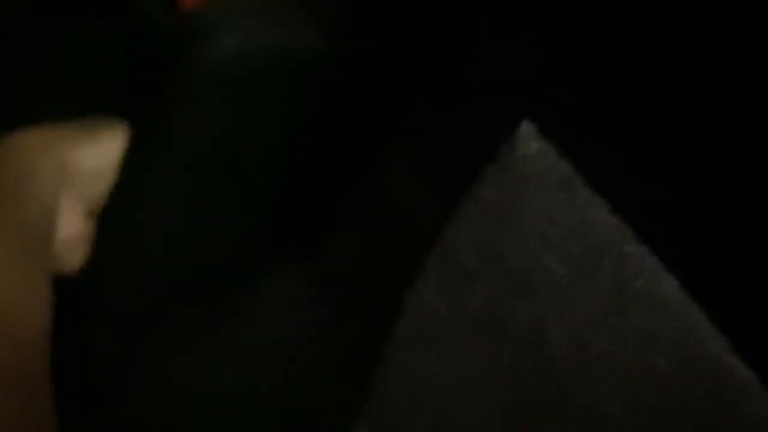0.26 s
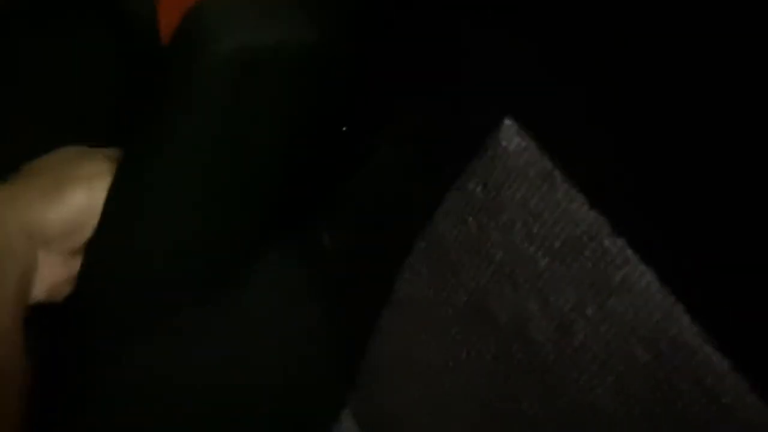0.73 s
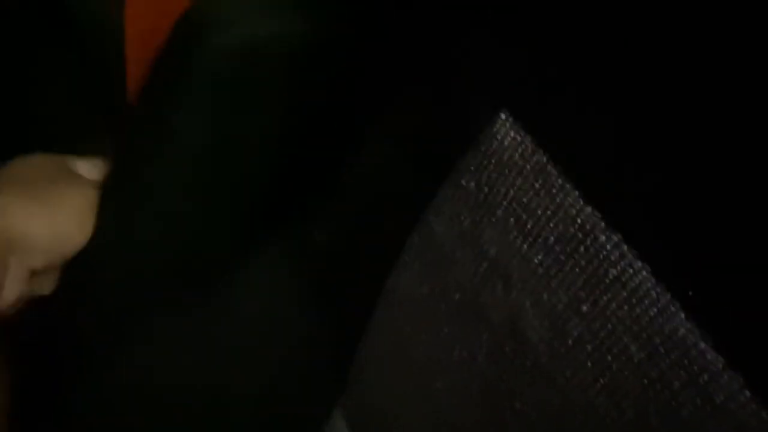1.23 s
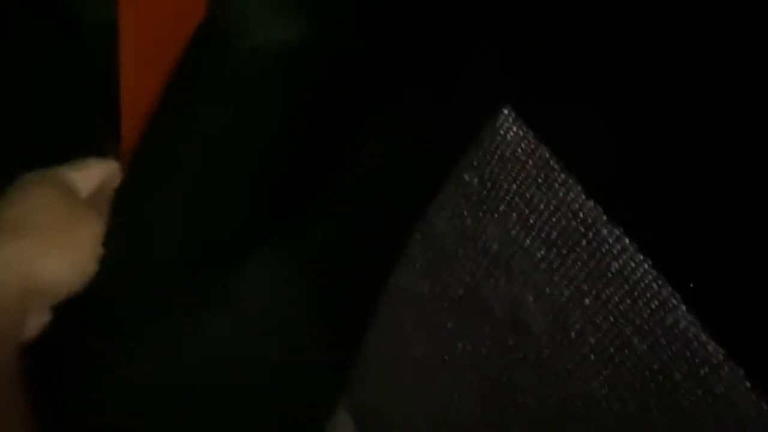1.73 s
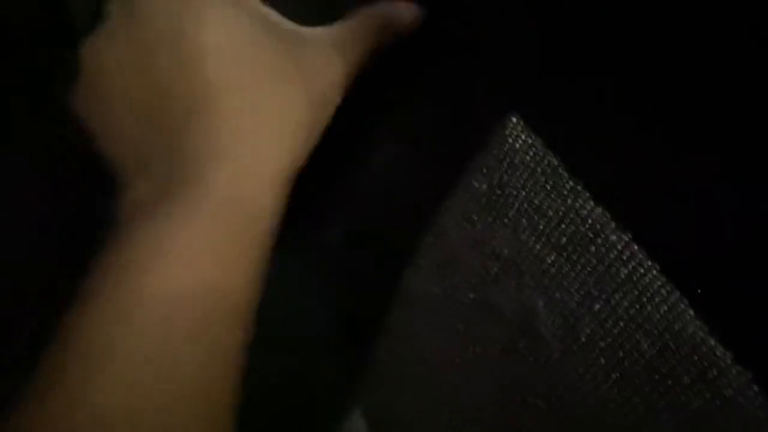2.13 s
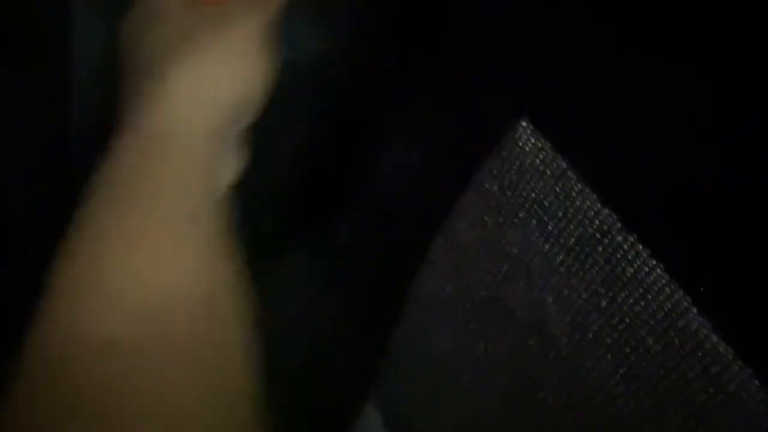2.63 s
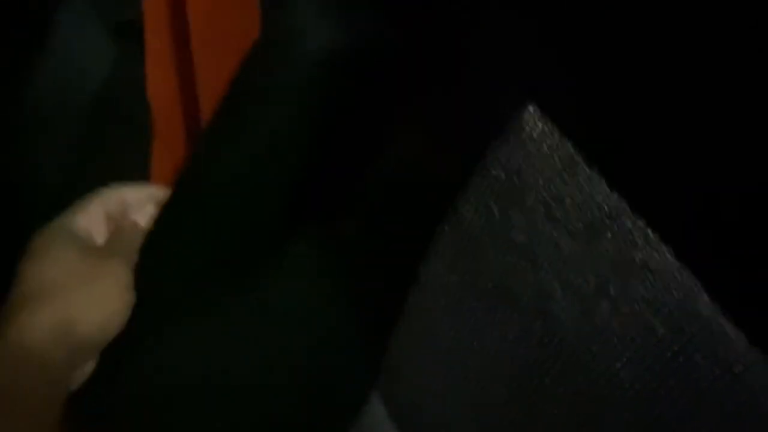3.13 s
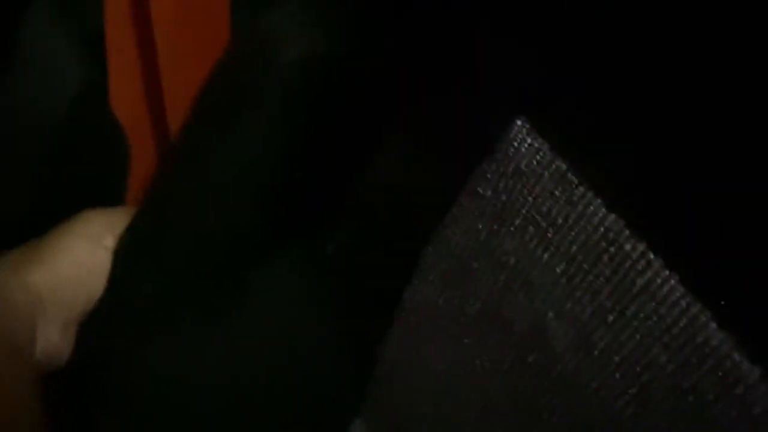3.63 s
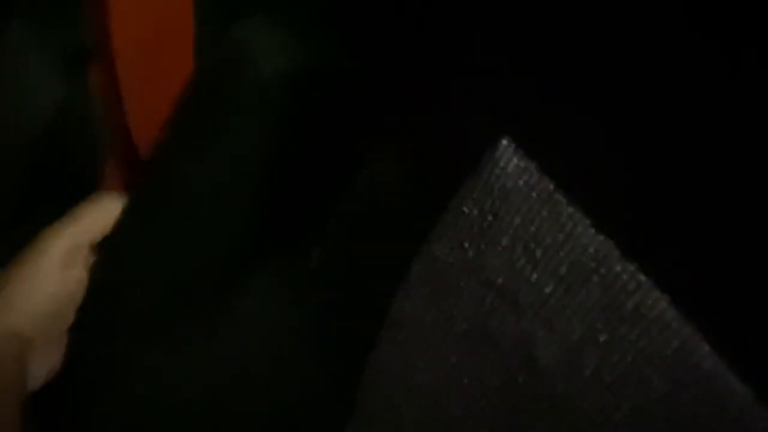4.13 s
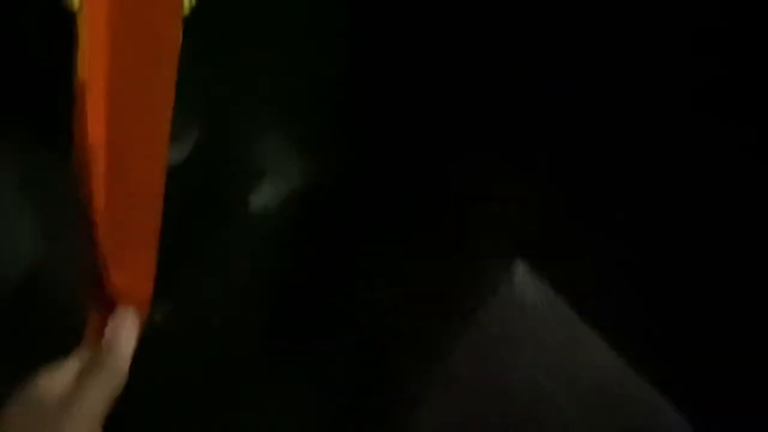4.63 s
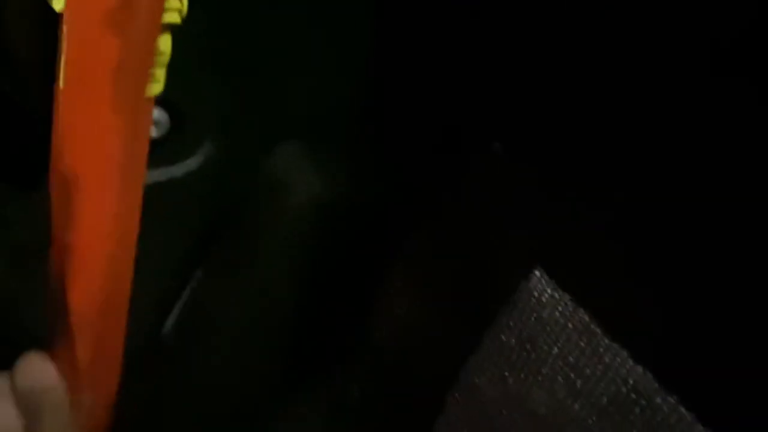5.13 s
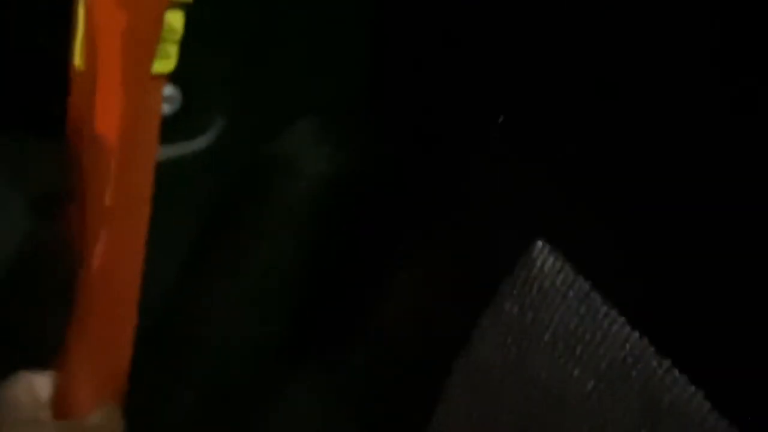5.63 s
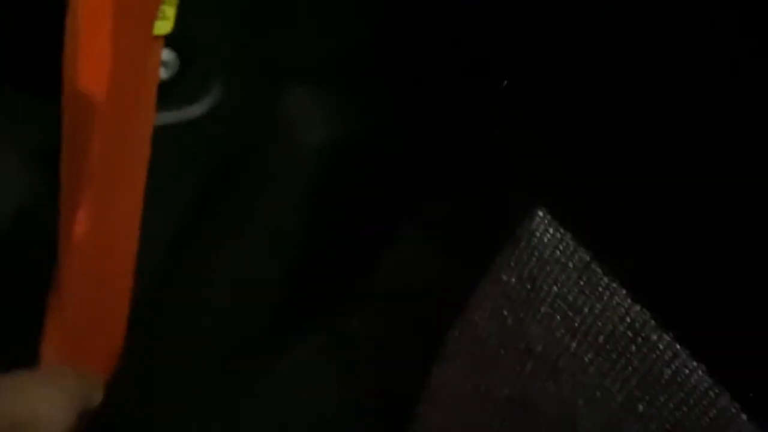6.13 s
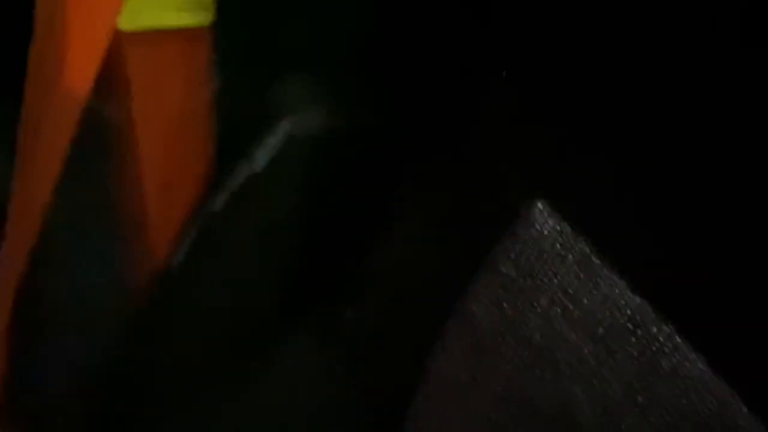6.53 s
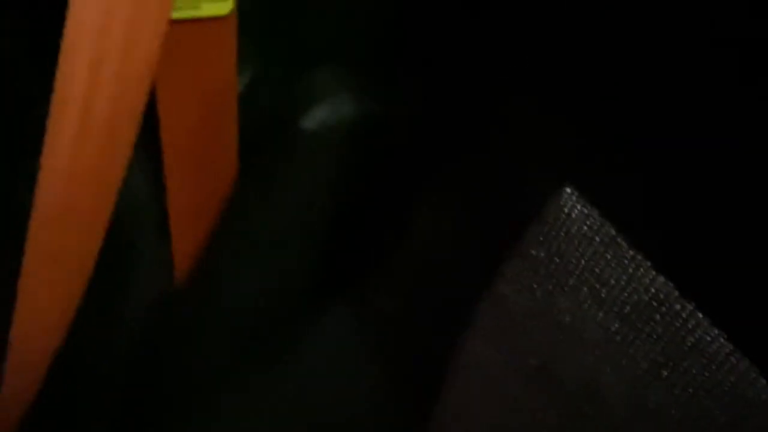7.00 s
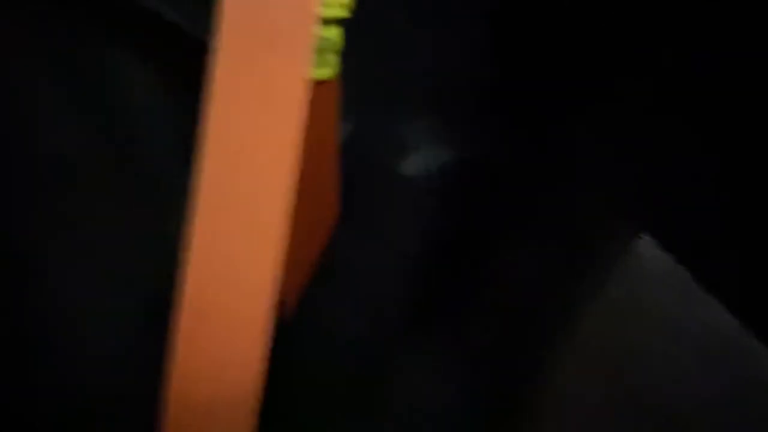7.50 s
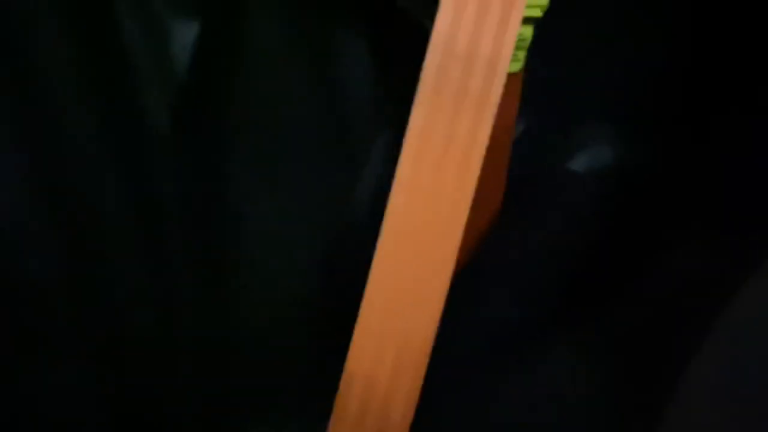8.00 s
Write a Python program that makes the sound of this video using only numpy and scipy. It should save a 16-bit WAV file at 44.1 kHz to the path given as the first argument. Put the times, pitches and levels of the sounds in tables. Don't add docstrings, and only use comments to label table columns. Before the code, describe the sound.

Inside a small parked truck cab, a hand draws out a seatbelt in uneven, dry rustling strokes. An early hollow knock hits the door, then light clicks and a cluster of dull bumps follow. A crisp metal click comes past the middle, then the loudest snap, with small ticks afterwards. A low idle hum and faint gliding traffic whine lie underneath. Close phone stereo pickup, very short reflections.

```python
import sys
import numpy as np
from scipy import signal
from scipy.fft import rfft, irfft, next_fast_len
from scipy.io import wavfile
from scipy.ndimage import uniform_filter1d

SR = 44100
rng = np.random.default_rng(int(sys.argv[2]) if len(sys.argv) > 2 else 0)


def rack_gain(trim_db):
    fader = np.asarray(trim_db, float)
    return 10 ** (fader / 20)


def waveform_to_disk(signal):
    frames = np.transpose(np.atleast_2d(signal))
    scaled = np.clip(frames, -1, 1) * 32767
    samples = np.round(scaled).astype(np.int16)
    wavfile.write(sys.argv[1], SR, samples)


N = 364026


def evened(x):
    return x / np.sqrt(np.mean(x ** 2) + 1e-20)


def curve(rows, column=1):
    rows = np.array(rows)
    return np.interp(np.arange(N) / SR, rows[:, 0], rows[:, column])


def colour(x, points, spread=0):
    f, db = np.transpose(points)
    size = next_fast_len(N + 4096, real=True)
    hz = np.fft.rfftfreq(size, 1 / SR)
    late = np.exp(-2j * np.pi * spread * (2 * np.sqrt(hz) - hz / np.sqrt(1000)))
    gain = rack_gain(np.interp(np.log(hz + 1), np.log(f), db, left=-130))
    return irfft(rfft(x, size) * late * gain, size)[:N]


def wander(rate_hz):
    t = np.arange(0, N + 256, 256) / SR
    rates = np.geomspace(rate_hz / 12, rate_hz, 16)
    slow = sum(np.sin(2 * np.pi * (f * t + rng.random())) / np.sqrt(f) for f in rates)
    return np.interp(np.arange(N) / SR, t, evened(slow))


# f/Hz, level/dB, slow wavering/dB
ENGINE_ORDERS = [(46.9, -45, -2), (48.2, -58, 5.5), (59.3, -52.5, 3), (70.6, -36, 0.56), (90.14, -45, 3),
                 (97.8, -63, 5), (136.4, -60, 2.5)]
# f/Hz, spectral density/dB per Hz
CAB_FLOOR = [(25, -95.5), (36, -65.5), (55, -60.5), (100, -63.5), (330, -83), (1000, -105.5), (3500, -121),
             (15000, -132)]


def engine():
    t = np.arange(N) / SR
    orders = 0
    for hz, db, waver_db in ENGINE_ORDERS:
        level = np.sqrt(2) * rack_gain(db + waver_db * wander(2.5))
        orders = orders + level * np.sin(2 * np.pi * (hz * t + rng.random()))
    floor = colour(rng.standard_normal(N), CAB_FLOOR) * np.sqrt(SR / 2)
    return orders + floor * rack_gain(2.8 * wander(4.0))


# t/s, f/Hz, level/dB
TRAFFIC_WHINES = [
    [(0, 263, -52), (.35, 282.8, -55.5), (.88, 292.3, -48), (1.2, 279, -53.5), (1.45, 292, -48),
     (2.45, 302, -43.5), (2.8, 314, -43.5), (3.55, 331, -47), (3.92, 303, -53)],
    [(4.45, 248, -52), (4.9, 252, -50), (5.1, 259, -50.5), (5.45, 254, -51.5), (5.85, 260, -53),
     (5.95, 256, -66), (6.45, 250, -61), (6.75, 246, -51), (7.0, 240, -54.5)],
    [(7.03, 232, -55), (7.45, 227, -51.5), (7.6, 224, -62.5), (7.9, 220, -60), (8.26, 224.3, -52.5)],
]
# t/s, level/dB
TYRE_WASH = [(0.0, -48), (1.9, -48), (2.89, -45), (3.88, -49.5), (4.57, -43.5), (4.78, -57.5), (6.59, -48),
             (7.88, -66), (8.25, -72)]
# f/Hz, level/dB
TYRE_COLOUR = [(80, 9.5), (130, 7), (240, 8.5), (330, 1.5), (520, -9.5), (800, -46.5)]


def traffic():
    t = np.arange(N) / SR
    out = rack_gain(curve(TYRE_WASH)) * evened(colour(rng.standard_normal(N), TYRE_COLOUR))
    for rows in TRAFFIC_WHINES:
        turns = np.cumsum(curve(rows) + 1.55 * wander(9.0)) / SR
        inside = uniform_filter1d(1.0 * (t > rows[0][0]) * (t < rows[-1][0]), size=2000)
        level = np.sqrt(2) * rack_gain(curve(rows, column=2) + 1.0 * wander(4.1))
        out += level * inside * np.sin(2 * np.pi * turns)
    return out


def grains(per_s, spread_db, smooth):
    snaps = rack_gain(spread_db * np.minimum(rng.exponential(1, N), 5)) * (rng.random(N) < per_s / SR)
    smooth = np.clip(smooth, 0, 1)
    return rng.standard_normal(N) * (smooth + (1 - smooth) * evened(uniform_filter1d(snaps, size=24)))


def strokes(rows, level_db, rest_db):
    t = np.arange(0, N + 64, 64) / SR
    middle, length = np.transpose(rows)[:2, :, None]
    bells = np.exp(-8 * ((t - middle) / length) ** 2)
    power = rack_gain(2 * level_db) @ bells + rack_gain(2 * rest_db)
    return np.interp(np.arange(N) / SR, t, np.sqrt(power))


# middle t/s, length/s, rub level/dB, fine hiss/dB and coarse drag/dB re rub
PULL_STROKES = [(0.018, 0.18, -60, -5.5, -0.5), (0.205, 0.14, -65, -5.5, 2), (0.343, 0.16, -67, -4.5, 4),
                (0.486, 0.089, -64.5, -7, -1), (0.577, 0.13, -65.5, -4.0, 0),
                (0.789, 0.19, -55.5, -5.5, -2.5), (0.91, 0.33, -66, -5, 3.5), (1.04, 0.076, -70, 1.5, 2),
                (1.24, 0.26, -61, -8, -6), (1.51, 0.14, -62.5, -5, 0), (1.78, 0.096, -63, -1.5, -1),
                (1.96, 0.3, -65, -5.5, -3), (2.465, 0.085, -60, -1.5, -11.5), (2.764, 0.37, -56, -4, -3.5),
                (2.898, 0.075, -58, 5, -14.6), (3.007, 0.39, -62.5, -6.5, 2.3),
                (3.279, 0.049, -55.5, 6.5, -3.5), (3.459, 0.12, -63.5, -6, -3),
                (3.585, 0.25, -67.5, -4, 3.5), (3.778, 0.13, -63, 0.5, -2), (3.935, 0.11, -66.5, -4, 7.5),
                (4.109, 0.23, -62.5, -16, 5), (4.31, 0.18, -63.5, -8, 1.5), (4.376, 0.044, -60, -6, 8)]
LOOP_STROKES = [(4.472, 0.062, -61, -11, 2.5), (4.682, 0.3, -55.5, -10, 1.5), (4.784, 0.07, -56.5, -5, -11),
                (4.942, 0.1, -64, -7, 5), (5.07, 0.097, -58, -8, 6), (5.235, 0.055, -60, 5, -3),
                (5.379, 0.78, -60.5, -7, 2), (5.595, 0.065, -54.5, -8, -10), (5.722, 0.16, -60, -5.5, -3.5),
                (6.147, 0.92, -71, -11, 1.5), (6.311, 0.12, -55, -9, -0.5),
                (6.474, 0.19, -52.5, -5.5, -0.5), (6.543, 0.46, -59, -16, -0.5), (6.777, 0.1, -52, -6, 2),
                (7.013, 0.11, -51, -7, -4.5), (7.193, 0.18, -63, -6, 1), (7.345, 0.43, -65, -5, -2),
                (7.581, 0.065, -57.5, -4.5, -7.5), (7.796, 0.22, -66, -7, -6.5),
                (8.16, 0.12, -71, -2.5, -12), (8.299, 0.29, -71, -14, -3)]
BRUSHES_AND_SLIDES = [
    (3.05, 0.12, -55.5, -27, -15),
    (3.235, 0.042, -67.5, 0, 2),
    (5.435, 0.057, -56, -7, -5),
    (6.66, 0.042, -55.5, -6.5, -4),
    (7.074, 0.071, -53.5, -9, -7.5),
    (7.3, 0.037, -70, 4, -12),
                      (1.505, 0.048, -57.5, -3, 0), (1.61, 0.076, -72, -7, 0), (1.765, 0.032, -63, -6, -2),
                (2.09, 0.076, -74, -7, -10), (2.26, 0.06, -74.5, 1, -4), (2.37, 0.044, -76, -2, -8),
                (3.36, 0.26, -69.5, -14, 3), (3.475, 0.047, -60.5, -4, 2.5), (3.83, 0.031, -65, -1, 2),
                (6.7, 0.06, -66, -6, 5), (6.9, 0.16, -68.5, -8, 1.5), (7.53, 0.023, -58.5, -10, -10),
                (7.61, 0.044, -60, -3, -4), (7.77, 0.031, -63, -9, -4), (7.965, 0.076, -73.5, 0, -14),
                (5.52, .06, -59, -5, -6)]
# middle t/s, length/s, level/dB
PANEL_SHOVES = [(0.028, 0.24, -52), (0.79, 0.18, -50), (1.854, 0.32, -55.5), (2.993, 0.26, -55.5),
                (3.456, 0.43, -53.5), (3.794, 0.46, -56), (4.13, 0.13, -48), (4.415, 0.66, -52),
                (4.598, 0.11, -44.5), (4.694, 0.12, -38.5), (6.483, 0.13, -40.5), (6.628, 0.11, -50),
                (7.11, 0.35, -56.5)]
# f/Hz, level/dB
RUB_SPECTRUM = [(2000, -15), (3200, -4), (4200, -0.5), (5800, -0.5), (7000, -4), (8500, -8), (9500, -48)]
HISS_SPECTRUM = [(7500, -16), (9000, 0), (10500, -1.5), (11800, -6), (13200, -9), (14500, -2), (15900, -9),
                 (16300, -68.5)]
DRAG_SPECTRUM = [(600, 0.5), (1200, 2), (1700, 1), (2300, -4), (3100, -6), (4000, -37.5)]
PUSH_SPECTRUM = [(90, -19), (180, -4), (380, -1), (650, -10.5), (900, -21), (1300, -43)]
REST_RUB_DB, REST_HISS_DB, REST_DRAG_DB, REST_PUSH_DB = -84.5, -96.5, -74, -68


def webbing():
    fibres = grains(1400, 1.4, 0.73)
    flutter = rack_gain(2.03 * wander(80.0))
    rows = PULL_STROKES + LOOP_STROKES + BRUSHES_AND_SLIDES
    rub_db, fine_db, coarse_db = np.transpose(rows)[2:]
    rub = strokes(rows, rub_db - 1.56, REST_RUB_DB) * evened(colour(fibres, RUB_SPECTRUM))
    hiss = strokes(rows, rub_db + fine_db + 0.22, REST_HISS_DB) * evened(colour(fibres, HISS_SPECTRUM))
    drag = strokes(rows, rub_db + coarse_db + 1.7, REST_DRAG_DB) * evened(colour(fibres, DRAG_SPECTRUM))
    shove = strokes(PANEL_SHOVES, np.transpose(PANEL_SHOVES)[2], REST_PUSH_DB)
    push = shove * rack_gain(2.1 * wander(30.0)) * evened(colour(grains(300, 3.0, 0.61), PUSH_SPECTRUM))
    return flutter * (rub + hiss + drag) + push


def strike(modes, centre_hz, contact_ms, chance, first, slope_db, detune):
    t = np.arange(len(chance)) / SR
    phase = t * 1000 / max(contact_ms, 0.3)
    contacts = chance ** 3 * (0.41 + 0.94 * phase) * np.exp(-phase ** 2)
    contacts[0] = first
    hz, t60 = np.transpose(modes)[:, :, None]
    hz = hz * (1 + detune * np.clip(chance[-len(modes):, None], -2, 2))
    drive = abs(np.exp(2j * np.pi * hz * t[:1000]) @ contacts[:1000])[:, None]
    drive = drive + 0.19 * np.linalg.norm(contacts)
    level = rack_gain(-slope_db * abs(np.log2(hz / centre_hz)) - 60 * t / t60)
    ring = (level * np.sin(2 * np.pi * hz * t) / drive).sum(axis=0)
    ring = signal.lfilter(*signal.butter(2, centre_hz / 2.87, "high", fs=SR), ring)
    sound = signal.fftconvolve(contacts, ring)[:len(t)]
    return sound / abs(sound).max(), contacts / abs(contacts).max()


# t/s, peak level/dB, strongest ring f/Hz, bright crack/dB, top end/dB
BUCKLE_CLICKS = [(0.0653, -33.5, 5170, -18, -0.5), (0.7766, -29.5, 1850, -29, -20),
                 (2.7935, -25, 1650, -41, -33), (2.9265, -27.5, 3470, -1, -33),
                 (3.0066, -28.5, 3500, 0, -7), (3.4151, -42.5, 2170, -5, -17),
                 (3.8926, -39.5, 2370, -19, -22), (4.369, -24, 1330, -15, -31),
                 (4.4638, -31, 1200, -15, -29), (4.6693, -27.5, 1460, -18, -25),
                 (4.6972, -26.5, 1310, -15.5, -25)]
LATCH_CLICKS = [(5.2191, -16.5, 2360, -4.5, -7), (5.2805, -36.5, 2000, -3, -7),
                (5.289, -34, 1400, -26, -30), (5.2964, -35.5, 1736, 0, -8), (5.337, -36, 1400, -28, -30),
                (5.604, -35, 4280, -9, -24), (6.2287, -34, 2200, -16, -29), (6.4083, -29, 1880, -11, -14),
                (6.4822, -24.5, 1750, -23, -23), (6.5196, -29, 3930, -17, -22),
                (6.539, -9.5, 3780, -25, -8), (6.6139, -30.5, 3500, -16, -22),
                (6.6528, -29.5, 1990, -7, -15), (6.7331, -39, 1960, -19.5, -20),
                (6.778, -27, 1290, -16, -19), (7.1262, -37, 2130, -7, -24), (7.1444, -39, 2086, -18.5, -23),
                (7.2245, -31, 1840, -13, -23), (7.357, -32.5, 3280, -10, -3),
                (7.4066, -39.5, 2900, -10, -24)]
FURTHER_CLICKS = [(2.715, -32.5, 1660, -24, -26), (2.928, -26.5, 1080, -22, -26),
                  (3.013, -27.5, 2600, -3.5, -12), (3.4346, -39.5, 1750, -2.5, -3),
                  (3.4559, -44, 1730, -4, -14), (5.2555, -36, 2100, -7, -7), (5.78, -42.5, 7500, -16, -17),
                  (6.2745, -37, 2200, -14, -22), (6.975, -38, 2970, -12, -22), (8.1165, -49, 2540, 0, -13),
                  (5.2158, -34, 2400, -4, -10), (5.579, -42, 3900, -8, -20)]
# f/Hz, t60/s
BUCKLE_MODES = [(1350, 0.01), (1650, 0.0032), (2083, 0.0052), (2450, 0.0064), (2740, 0.0021), (3268, 0.012),
                (3700, 0.007), (4226, 0.0086), (4802, 0.0073), (5556, 0.017), (5873, 0.019), (6465, 0.013),
                (7262, 0.0092)]
CHATTER_MS = 2.57


def buckle():
    out, crack, top = np.zeros((3, N + SR))
    clicks = BUCKLE_CLICKS + LATCH_CLICKS + FURTHER_CLICKS
    chances = rng.standard_normal((len(clicks), 2500))
    for (s, db, hz, crack_db, top_db), chance in zip(clicks, chances):
        ring, contacts = strike(BUCKLE_MODES, hz, CHATTER_MS, chance, first=3.4, slope_db=17.5, detune=0.0094)
        start = round(s * SR)
        out[start:][:2500] += rack_gain(db - 3.0) * ring
        crack[start:][:2500] += rack_gain(db + crack_db + 15.0) * contacts
        top[start:][:2500] += rack_gain(db + top_db + 12.0) * contacts
    return out[:N] + colour(crack[:N], RUB_SPECTRUM) + colour(top[:N], HISS_SPECTRUM)


# t/s, peak level/dB, strongest ring f/Hz, contact/ms
DOOR_KNOCKS = [(0.7786, -13, 323, 3.6), (0.826, -34.5, 344, 13), (1.785, -41, 400, 12),
               (1.928, -36.5, 297, 13), (2.981, -25.5, 340, 7.3), (3.007, -30, 221, 8.7),
               (3.289, -36.5, 320.8, 6.0), (3.759, -36.5, 308, 5.1), (3.892, -28.5, 239, 4.7),
               (4.158, -27, 328, 5.5), (4.366, -26, 384, 8.3), (4.457, -21, 370, 7.5),
               (4.47, -23.5, 330, 9.1), (4.521, -25.5, 260, 7.4), (4.569, -34.5, 420, 3.9),
               (4.589, -28.5, 253, 15), (4.627, -28.5, 234, 3), (4.672, -29, 390, 6.4),
               (4.7, -28.5, 356, 11), (4.719, -28.5, 380, 4.9), (5.224, -32, 316, 17),
               (6.463, -33.5, 318, 8.1), (6.516, -32.5, 283, 3.6), (6.545, -27, 267, 6.1),
               (6.636, -37.5, 253, 5.8)]
HIGHER_KNOCKS = [
    (3.426, -33.5, 460, 2.47),
    (4.368, -23, 506, 6),
    (4.451, -31, 764, 15),
    (6.418, -38, 424, 4.9),
    (6.524, -29.5, 476, 5.5),
    (6.584, -38.5, 546, 5.0),
    (6.664, -43, 520, 5.2),
    (6.779, -27, 534, 6.5),
    (7.004, -43, 437, 8),
    (7.224, -33.5, 577, 3.1),
]
SKIN_BOOMS = [
    (0.801, -28, 123, 8.6),
    (2.999, -30, 139, 11),
    (6.48, -33, 111.7, 27),
    (6.66, -33.5, 150, 14),
    (6.783, -27.5, 122, 10),
]
# f/Hz, t60/s
PANEL_MODES = [(82, 0.21), (112, 0.25), (188, 0.057), (250, 0.077), (320, 0.079), (385, 0.084), (460, 0.07),
               (554, 0.071), (700, 0.077), (800, 0.083), (947, 0.015)]
# f/Hz, level/dB
PANEL_COLOUR = [(40, 12.0), (100, 4.0), (900, 1.0), (1500, -0.5), (4000, -8), (16000, -41)]


def door():
    out = np.zeros(N + SR)
    blows = DOOR_KNOCKS + HIGHER_KNOCKS + SKIN_BOOMS
    for (s, db, hz, contact_ms), chance in zip(blows, rng.standard_normal((len(blows), 6000))):
        felt = chance * ((abs(chance) > 2.6) | (np.arange(6000) > 5900))
        knock, _ = strike(PANEL_MODES, hz, contact_ms, felt, first=60.0, slope_db=17.0, detune=0.064)
        out[round(s * SR):][:6000] += rack_gain(db) * knock
    return colour(out[:N], PANEL_COLOUR, spread=0.1073)


# start t/s, length/s, ring f/Hz, level/dB
TONGUE_SCRAPES = [(2.792, 0.0032, 1630, -65), (2.803, 0.012, 1700, -83), (2.843, 0.007, 1800, -87),
                  (2.926, 0.0031, 3730, -71), (2.927, 0.0041, 2600, -70.5), (3.007, .011, 4800, -67.5),
                  (3.008, 0.0064, 1860, -74), (3.04, 0.039, 4340, -73), (4.617, 0.037, 1820, -79),
                  (4.68, 0.045, 1290, -65), (5.286, 0.015, 1400, -67), (5.318, 0.038, 1400, -65.5),
                  (5.419, 0.027, 1887, -72), (5.49, 0.035, 2020, -70), (5.573, 0.054, 4300, -65),
                  (6.387, .006, 2980, -76), (6.405, 0.009, 2600, -69), (6.439, 0.0099, 2170, -73),
                  (6.475, 0.0064, 4370, -77), (6.483, .02, 1750, -63), (6.494, 0.0066, 4570, -84),
                  (6.5195, 0.002, 3900, -74), (6.539, .005, 5840, -58.5), (6.587, 0.0087, 1560, -75),
                  (6.588, 0.056, 3520, -65), (6.61, 0.0082, 4680, -77), (6.747, .005, 2285, -76),
                  (6.755, 0.019, 2200, -67.5), (6.78, 0.012, 1320, -73), (7.01, 0.017, 3930, -72),
                  (7.062, 0.018, 1900, -80), (7.071, 0.016, 5000, -71), (7.126, 0.019, 2127, -73.5),
                  (7.127, 0.023, 4700, -72.5), (7.224, 0.016, 1840, -74), (7.355, 0.017, 2500, -75),
                  (7.36, 0.0039, 4730, -73.5), (7.403, 0.0075, 4480, -91)]
PANEL_JUDDERS = [(4.369, 0.017, 373, -48.5), (4.369, 0.013, 730, -57), (4.452, 0.052, 400, -54),
                 (4.453, 0.028, 780, -52.5), (4.519, 0.035, 540, -67), (4.57, 0.048, 730, -63),
                 (4.63, 0.037, 696, -54.5), (4.668, 0.046, 373, -41.5), (4.667, 0.076, 704, -48.5),
                 (6.57, 0.085, 530, -60.5), (7.224, .018, 600, -60)]
SHUDDERS_AND_RATTLES = [
    (0.822, 0.024, 370, -54.5),
    (4.46, 0.025, 1490, -68),
    (6.42, 0.081, 1050, -70),
    (6.508, 0.018, 790, -58),
    (6.54, 0.016, 1016, -65.5),
    (6.65, 0.016, 635, -65),
    (6.778, .007, 520, -57),
    (7.211, 0.0026, 800, -82),
    (8.169, 0.006, 2700, -92),
                        (2.794, .005, 2200, -82), (3.013, .006, 2130, -82), (4.671, 0.0054, 1340, -76),
                  (4.688, .005, 1300, -79), (4.698, .007, 1400, -76), (4.712, .005, 1300, -84),
                  (4.462, .02, 650, -62), (6.04, .012, 2000, -80.5), (6.054, .005, 3980, -93),
                  (6.417, .005, 1700, -80), (6.42, .01, 3800, -75), (6.433, .004, 4300, -86),
                  (6.443, .004, 3600, -86), (6.462, 0.0055, 1800, -76), (6.529, .004, 1800, -80),
                  (6.51, .008, 2100, -80), (7.23, 0.011, 2400, -79), (7.368, .006, 2600, -82),
                  (7.372, .006, 4500, -89), (8.004, .003, 1200, -102), (8.169, .006, 1600, -98),
                  (8.184, .01, 3150, -93), (8.2, .015, 2500, -92), (8.21, .04, 1500, -84),
                  (8.121, .008, 1600, -96), (1.49, .03, 1750, -78), (1.49, .02, 2700, -76),
                  (6.652, .008, 1900, -76)]
SCRAPE_Q, SCRAPE_RISE_S = 5.5, 0.0015


def scrapes():
    out = np.zeros(N + SR)
    t = np.arange(6000) / SR
    rows = TONGUE_SCRAPES + PANEL_JUDDERS + SHUDDERS_AND_RATTLES
    for (s, length, hz, db), chance in zip(rows, rng.standard_normal((len(rows), 6000))):
        grip = np.minimum(t / SCRAPE_RISE_S, 1) * np.exp(-(t / length) ** 2)
        ring = signal.iirpeak(hz, SCRAPE_Q, SR)
        slips = chance * abs(chance) * grip
        sound = signal.lfilter(*ring, signal.lfilter(*ring, slips))
        out[round(s * SR):][:6000] += rack_gain(db) * evened(sound) * np.sqrt(6000 / SR / length)
    return out[:N]


def echoes():
    t = np.arange(2400) / SR
    decay = rack_gain(-60 * t / 0.044) * (t > 0.0012)
    return [rng.choice([-1.0, 1.0], (2, 2400)) * (rng.random((2, 2400)) < 0.08) * decay for k in range(6)]


def walls(x, tails):
    turn = np.arange(N) / SR / 0.13
    out = 0
    for k, tail in enumerate(tails):
        window = np.cos(np.pi / 2 * np.clip((turn - k + 3) % 6 - 3, -1, 1))
        tail = tail / np.linalg.norm(tail, axis=1, keepdims=True)
        out = out + signal.oaconvolve((x * window)[None], tail, axes=1)[:, :N]
    return out


# f/Hz, lag of right/cycles, left minus right/dB, share of cab reflections/0-1
PORT_PAIR = [(0, -0.039, 1.5, 0.13), (96, .02, -0.5, 0.02), (170, 0.0087, -3.5, 0.32),
             (398, 0.17, -3.5, 0.37), (926, 0.28, 4, 0.71), (1730, 0.92, -5, 0.91), (3020, 1.36, 3, 0.29),
             (3700, 1.12, 4.5, 0.43), (5770, 1.282, 3, 0.28), (6360, 1.04, 3, 0.6), (7310, 0.9, 2, 0.64),
             (8460, 0.438, 0, 0.04), (15770, -1.5, 0, 0.4)]
PAD = 2048


def scene():
    sound = engine() + traffic() + webbing() + buckle() + door() + scrapes()
    size = next_fast_len(N + 2 * PAD, real=True)
    f, *columns = np.transpose(PORT_PAIR)
    hz = np.fft.rfftfreq(size, 1 / SR)
    lag, balance_db, share = (np.interp(hz, f, column) for column in columns)
    share = np.clip(share, 0, 1)
    side = np.array([[1], [-1]])
    direct = rfft(np.pad(sound, PAD, "reflect"), size) * np.exp(1j * np.pi * side * lag)
    thrown = rfft(np.pad(walls(sound, echoes()), ((0, 0), (PAD, PAD)), "reflect"), size)
    ports = rack_gain(side * balance_db / 2) * (np.sqrt(1 - share ** 2) * direct + share * thrown)
    return irfft(ports, size)[:, PAD:PAD + N]


def top_cut(x):
    return signal.sosfilt(signal.butter(12, 16500, fs=SR, output="sos"), x)


def record(dry):
    low_pass = signal.firwin(511, 15950, window=("kaiser", 9), fs=SR)
    padded = np.pad(dry, ((0, 0), (255, 255)), "reflect")
    limited = signal.oaconvolve(padded, low_pass[None], "valid", axes=1)
    return top_cut(limited)


dry = scene()
out = record(dry)
waveform_to_disk(out)
```